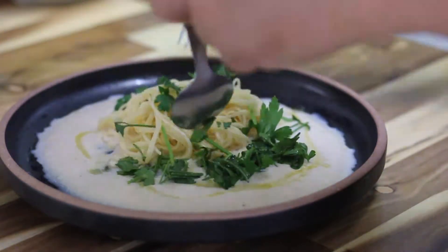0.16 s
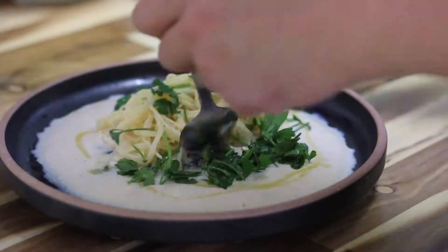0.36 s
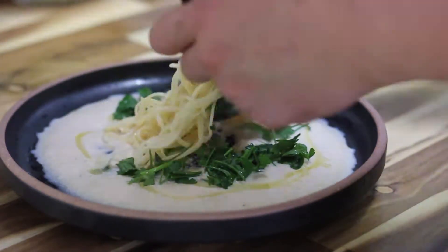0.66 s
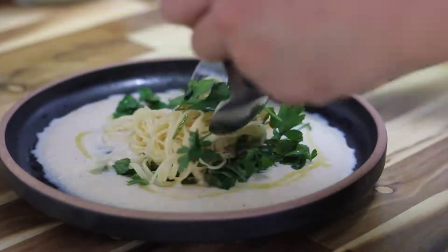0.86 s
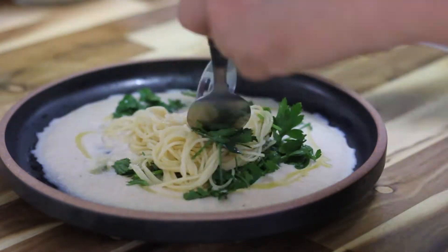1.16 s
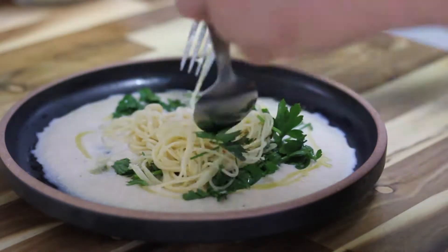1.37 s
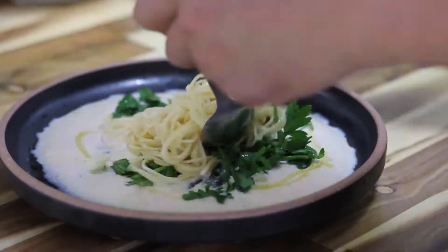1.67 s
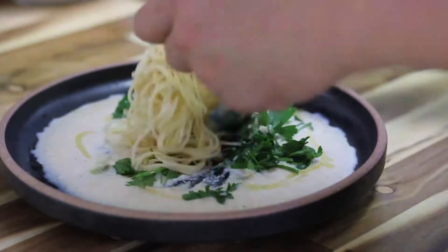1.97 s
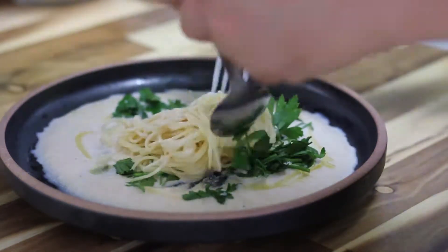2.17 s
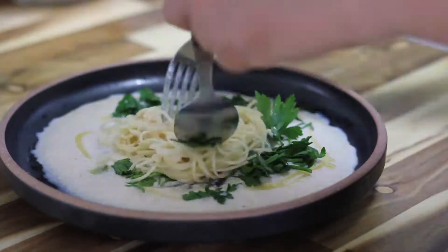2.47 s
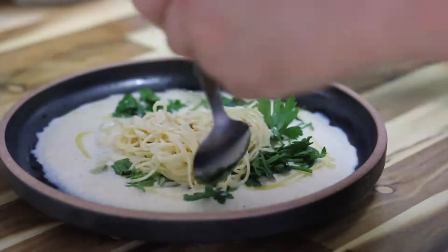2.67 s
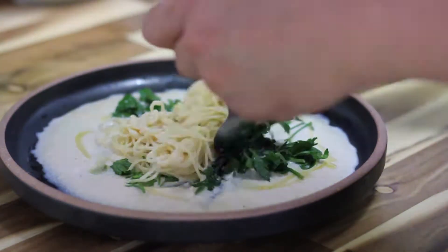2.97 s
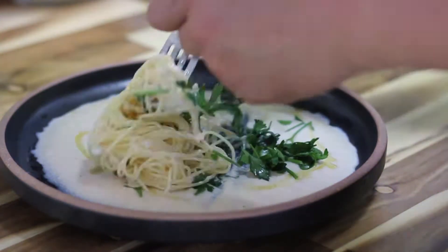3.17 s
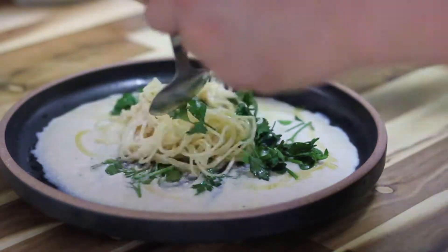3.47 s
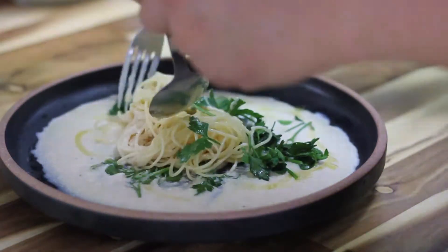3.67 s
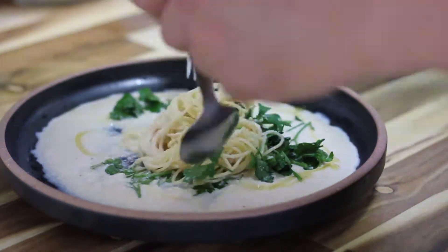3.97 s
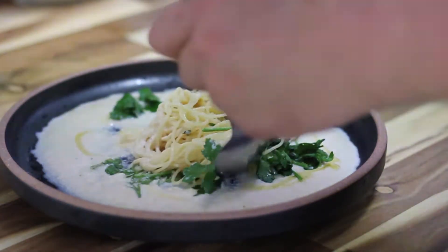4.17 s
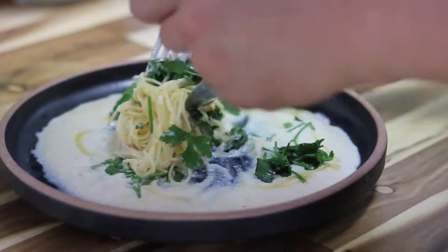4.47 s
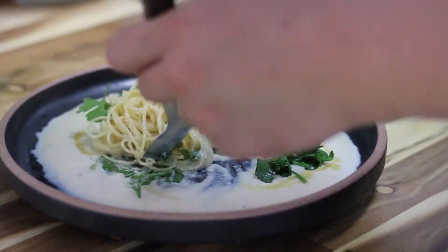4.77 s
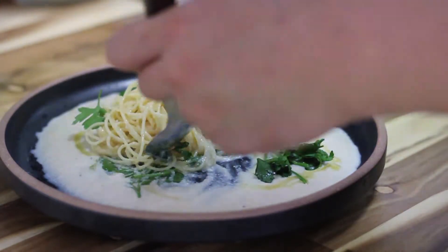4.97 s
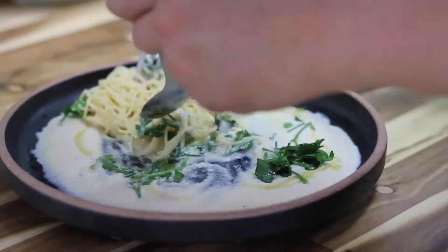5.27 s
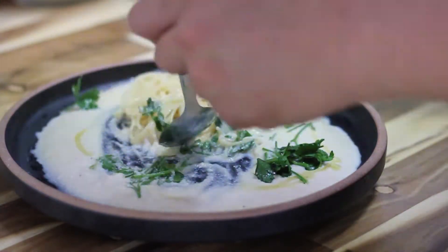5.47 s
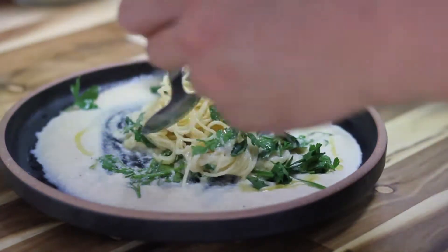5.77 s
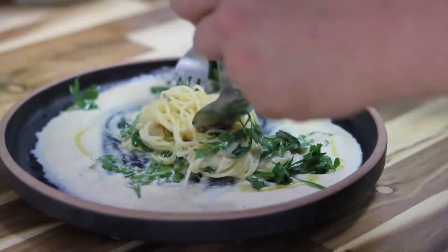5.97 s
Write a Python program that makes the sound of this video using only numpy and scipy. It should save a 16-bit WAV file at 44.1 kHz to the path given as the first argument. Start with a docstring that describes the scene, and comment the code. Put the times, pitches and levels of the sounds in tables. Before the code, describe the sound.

A metal fork and spoon knock, clink and scrape on a stoneware plate while twirling wet pasta, over a steady kitchen hum.

```python
"""One microphone near a stoneware plate of pasta on a wooden table, in a small, hard-walled kitchen.
An appliance hums behind from the start; wet strands tick and squelch as fork and spoon twirl them.
At 0.3 s the cutlery knocks on the plate and shakes the table; at 1.1 s the fork clinks. Light skids
over the glaze follow, then two more knocks, at 3.7 and 4.1 s, each running into a scrape. Short steel
squeals come near 4.7 and 5.4 s, and the pasta crackles to the end. The room answers every contact."""
import sys
import numpy as np
from scipy import signal
from scipy.fft import rfft, irfft
from scipy.io import wavfile

SR = 44100
rng = np.random.default_rng(int(sys.argv[2]) if len(sys.argv) > 2 else 0)


def digitize_waveform(pressure):
    """Quantize a signal to 16-bit integers and store it at the path in sys.argv[1].

    Rows of a 2-D input are taken as channels; values are limited to [-1, 1].
    """
    field = np.atleast_2d(pressure).T
    bounded = np.clip(field, -1, 1)
    quanta = np.round(bounded * 32767).astype(np.int16)
    wavfile.write(sys.argv[1], SR, quanta)


N = 269451


def amp(db):
    """Decibels to gain."""
    return 10 ** (np.asarray(db) / 20)


def unit_rms(x):
    """Scales to an rms of one."""
    return x / np.sqrt(np.mean(x ** 2) + 1e-20)


def curve_at(points, hz, column=1):
    """Interpolates one column of a table on a log-frequency axis."""
    columns = np.transpose(points)
    return np.interp(np.log(hz + 1), np.log(columns[0] + 1), columns[column])


def add(mix, start_s, sound):
    """Mixes a sound in at its start time."""
    part = mix[max(round(start_s * SR), 0):][:len(sound)]
    part += sound[:len(part)]


def band(x, hz, octaves):
    """A gentle band-pass around hz."""
    half_span = 2 ** (octaves / 2)
    top_hz = min(hz * half_span, .47 * SR)
    low_hz = min(hz, top_hz) / half_span
    return signal.sosfilt(signal.butter(2, [low_hz, top_hz], "band", fs=SR, output="sos"), x)


def drift(rate_hz):
    """A slow random wander with an rms of one."""
    hz = np.fft.rfftfreq(N, 1 / SR)[:N // 64]
    slow = irfft(rfft(rng.standard_normal(N))[:len(hz)] * np.exp(-(hz / rate_hz) ** 2))
    return unit_rms(np.interp(np.linspace(0, len(slow) - 1, N), np.arange(len(slow)), slow))


def room_tone(level_db=-49.5):
    """The steady rush of air all around the microphone."""
    # spectrum of the room's air: (frequency [Hz], relative density [dB])
    spectrum = [(15, -78), (25, -28.5), (185, -11), (236, -2.5), (293, -9.5), (405, -8.5), (463, -7.5),
                (531, -13.5), (754, -15), (988, -19.5), (2690, -24), (3620, -25), (4370, -27.5),
                (14800, -36.5), (16000, -40)]
    colour = amp(curve_at(spectrum, np.fft.rfftfreq(N, 1 / SR)))
    return amp(level_db) * unit_rms(irfft(rfft(rng.standard_normal(N)) * colour, N))


def appliance_hum(drift_hz=9, flutter_db=0.45):
    """A motor in the background, its tones wavering a little in pitch and level."""
    # motor tones: (frequency [Hz], rms level [dB], rms pitch waver [Hz])
    tones = [(120.4, -64.5, 1.18), (238.8, -52.5, 4.82), (471.5, -47, 0.73), (654, -65.5, 1.24),
             (762.5, -61, 0.75), (3305, -72, 1.62), (3510, -86, 1.8), (3780, -73.5, 2.04)]
    hum = np.zeros(N)
    for hz, db, waver_hz in tones:
        phase = 2 * np.pi * np.cumsum(hz + waver_hz * drift(drift_hz)) / SR
        hum += amp(db) * np.sqrt(2) * np.sin(phase)
    return hum * amp(flutter_db * drift(drift_hz))


def kitchen(direct_db=-3, tail_delay_s=.006):
    """From plate to microphone: the direct path, near bounces and a tail that dies band by band."""
    # reverberation: (frequency [Hz], time to fall 60 dB [s], tail level [dB])
    reverb = [(144, 1, -1.5), (398, 0.27, 2), (1070, 0.44, -1.5), (2400, .35, -3.5), (5440, 0.34, 1.5),
              (10800, 0.33, -6), (15600, 0.27, -0.5)]
    # bounces off nearby surfaces: (delay [s], level [dB])
    echoes = [(.005, -9), (0.0112, -29), (.012, -14.5)]
    hz, t, tail = signal.stft(rng.standard_normal(SR // 2), SR, nperseg=256)
    decay_rate = np.log(1000) / curve_at(reverb, hz)[:, None]
    tail_gain = amp(curve_at(reverb, hz, column=2))[:, None]
    tail *= tail_gain * np.exp(-decay_rate * t) * np.sqrt(2 * decay_rate / SR)
    response = np.zeros(SR // 2)
    add(response, tail_delay_s, signal.istft(tail, SR, nperseg=256)[1])
    for delay_s, db in [(0.001, direct_db)] + echoes:
        add(response, delay_s, amp([db]))
    return response


def stirring(rest_db=-72.5, turn_ends_db=-10):
    """How hard the pasta is worked: each turn of the fork swells and eases in one arch."""
    # turns of the fork: (time [s], length [s], crackle level at mid-turn [dB])
    turns = [(0, 0.041, -53.5), (0.5, 0.45, -71), (1.64, 0.5, -62.5), (2.335, 0.24, -57),
             (3.162, 0.39, -56), (3.82, 0.16, -60), (4.48, 0.17, -57.5), (5.078, 0.32, -50.5),
             (5.566, 0.18, -57), (5.94, 0.14, -51)]
    effort = np.full(N, amp(rest_db))
    for start_s, length_s, db in turns:
        arch_db = turn_ends_db * np.linspace(-1, 1, int(length_s * SR)) ** 2
        add(effort, start_s, amp(db + arch_db))
    return effort


def squelch(pops_per_s=190, low_hz=4200, high_hz=14000, octaves=0.29, bands=8):
    """Tiny wet pops of many pitches, their level following the stirring."""
    pops = np.zeros(N)
    for hz in np.linspace(low_hz, high_hz, bands):
        onsets = rng.random(N) < pops_per_s / bands / SR
        sizes = amp(4 * np.minimum(rng.exponential(1, N), 3))  # spread over 12 dB
        pops += band(onsets * sizes + 1e-9, hz, octaves)
    return stirring() * unit_rms(pops)


def sauce_ticks(gain_db=3.5, octaves=0.79):
    """Films of sauce snap between parting strands, each a click of a few cycles."""
    # the loudest snaps: (time [s], relative peak level [dB], pitch [Hz])
    snaps = [(0.0456, -31.5, 6600), (1.2286, -26.5, 3680), (1.9067, -36, 13700), (2.4857, -32, 4010),
             (2.6412, -35, 10500), (2.9756, -28.5, 5000), (3.1258, -27.5, 11000), (4.5935, -30.5, 5300),
             (4.6438, -26.5, 9700), (5.0814, -25.5, 13300), (5.1899, -28, 3890), (6.0252, -36, 3200)]
    out = np.zeros(N)
    for start_s, db, hz in snaps:
        snap = band(signal.unit_impulse(SR // 100), hz, octaves)
        add(out, start_s, amp(db + gain_db) * snap / abs(snap).max())
    return out


def ring(modes, pitch=1, tilt_db=0, narrow_hz=20, pivot_hz=8000):
    """A body's answer to a tap, as two rows: its damped modes and its long, narrow ones."""
    time = np.arange(SR // 2) / SR
    rows = np.zeros((2, len(time)))
    for hz, width_hz, db in modes:
        narrow = width_hz < narrow_hz
        decay_rate = np.pi * width_hz * (1 if narrow else np.pi / 2)
        t = time[:int(10 * SR / decay_rate)]
        # a damped resonance builds up while the bending wave crosses the body
        build_up = 1 if narrow else decay_rate * t
        envelope = build_up * np.exp(-decay_rate * t)
        gain = amp(db + tilt_db * np.log2(hz / pivot_hz)) * 2 * decay_rate / SR
        add(rows[int(narrow)], 0, gain * envelope * np.cos(2 * np.pi * hz * pitch * t))
    return rows


def radiate(body):
    """Damped modes fill the room, by new paths for each contact; narrow ones ring on by themselves."""
    damped, lasting = body
    return lasting + signal.fftconvolve(damped, kitchen())[:len(lasting)]


def plate_on_table(table, plate, table_db, plate_db, push_hz, push_octaves):
    """The plate rings in the band a contact pushes; the table shakes, deeper for a heavier contact."""
    lowest_hz, heavy_db, octaves_per_db = 100, 25, 0.54
    cutoff_hz = lowest_hz * 2 ** np.clip((heavy_db - table_db) * octaves_per_db, 0, 1)
    thud = signal.sosfilt(signal.butter(3, cutoff_hz, "high", fs=SR, output="sos"), table)
    return amp(table_db) * thud + amp(plate_db) * band(plate, push_hz, push_octaves)


def stick_slip(length_s, swell_db, slips_per_s=2200, spread_db=4, grit=0.068, swell_curve=0.64):
    """Steel catches and slips on the glaze: a dense run of uneven jolts with an energy of one."""
    size = int(length_s * SR)
    onsets = rng.random(SR)[:size] < slips_per_s / SR
    strength = amp(spread_db * rng.standard_normal(SR)[:size])
    grain = rng.standard_normal(SR)[:size]
    jolts = onsets * strength * np.sign(grain) + grit * grain
    for _ in range(3):  # flatten the spectrum, so all modes are fed alike
        phase = np.angle(rfft(jolts, 2 * size))
        jolts = irfft(np.exp(1j * phase))[:size]
    hand_pressure = amp(swell_db * np.linspace(0, 1, size) ** swell_curve)
    return unit_rms(jolts * hand_pressure) / np.sqrt(size)


def cutlery_skids(table, plate):
    """Tines and spoon edge skid over the plate, which grinds while the steel rasps and squeals."""
    # strokes: (time [s], length [s], swell from start to end [dB], table level [dB], plate level [dB],
    # squeal level [dB], push centre [Hz], push span [octaves], squeal pitch [ratio], tilt [dB/octave])
    strokes = [(0.303, 0.026, -3, 24.5, 10, -8, 1430, 1.2, 0.8, -8),
               (1.579, 0.0096, 1, -1, 8.5, 5, 1660, 1.37, 1.05, -0.5),
               (2.715, 0.12, -10, 6.5, 13, -36, 714, 0.4, 1.2, 0),
               (2.853, 0.019, -4, 3, 9.5, 6.5, 1900, 0.65, 1.12, 1),
               (2.883, 0.012, -20, -7, 11, 4, 2020, 0.73, 1.08, 1),
               (3.747, 0.038, -8, 20, 18, -0.5, 4270, 0.56, 0.96, -4),
               (4.124, 0.14, -4.5, 13.5, 25, 3.5, 1900, 1.71, 1.253, -4),
               (4.666, 0.079, 11, 3, 1.5, 11, 1740, 2.2, 1.024, 1),
               (5.427, 0.065, -4, 10, 7, 13.5, 2550, 1.5, 1.015, 6.5),
               (5.493, 0.013, 2, 5, 1.5, 9.5, 2300, 2.2, 0.95, 4)]
    # steel squealing on glaze, before a stroke's pitch and tilt: (frequency [Hz], width [Hz], level [dB])
    squeal_modes = [(2450, 320, 0), (3353, 400, -12), (4976, 450, -2), (5850, 620, 3), (7538, 800, -11),
                    (8550, 500, -8), (10600, 680, 5), (11500, 550, 0), (12300, 450, -5), (13741, 650, -13),
                    (15010, 700, -8)]
    # the broad rasp of the contact, likewise: (frequency [Hz], width [Hz], level [dB])
    rasp = [(8000, 2500, -9)]
    out = np.zeros(N)
    for start_s, length_s, swell_db, table_db, plate_db, squeal_db, hz, span, pitch, tilt_db in strokes:
        grind = plate_on_table(table, plate, table_db, plate_db, hz, span)
        squeal = amp(squeal_db) * ring(squeal_modes + rasp, pitch, tilt_db)
        add(out, start_s, signal.fftconvolve(stick_slip(length_s, swell_db), radiate(grind + squeal)))
    return out


def cutlery_knocks(table, plate):
    """In the foreground, single hard contacts of steel on steel and steel on stoneware."""
    # contacts: (time [s], table level [dB], plate level [dB], fork level [dB], spoon level [dB],
    # centre of the push on the plate [Hz], push span [octaves])
    contacts = [(0.2994, 8, 7, 9, 16.5, 1810, 1.1), (0.3365, 16, 22, -1.5, 10, 2600, 4.9),
                (0.3419, 26, 16.5, -8, -20, 1300, 3.1), (1.0996, -24, -39, 15, 0, 3100, 1.3),
                (3.732, 13, 6, -2.5, 13, 1610, 4.2), (3.7394, 21, 16.5, -14, -9, 1010, 2.3),
                (4.125, 18.5, 15, -10, -10, 2700, 1.85)]
    # modes of the fork: (frequency [Hz], width [Hz], level [dB])
    fork_modes = [(2734, 88, -2), (3433, 120, -1.5), (5300, 280, -4.5), (6500, 540, -8.5), (8710, 260, 4),
                  (11300, 320, 0.5), (12000, 240, 7.5), (13200, 570, 5), (13900, 490, -4), (15185, 560, -2)]
    # modes of the spoon: (frequency [Hz], width [Hz], level [dB])
    spoon_modes = [(2580, 210, -6), (5430, 1270, -7), (6320, 200, -7.5), (7480, 360, -9),
                   (8930, 150, -18.5), (11010, 300, -0.5), (12300, 1100, -7.5), (14100, 780, -11)]
    fork, spoon = ring(fork_modes), ring(spoon_modes)
    out = np.zeros(N)
    for start_s, table_db, plate_db, fork_db, spoon_db, hz, span in contacts:
        knock = plate_on_table(table, plate, table_db, plate_db, hz, span)
        clink = amp(fork_db) * fork + amp(spoon_db) * spoon
        add(out, start_s, radiate(knock + clink))
    return out


def scene():
    """Cutlery, plate and pasta near the microphone, the humming kitchen behind, in mono."""
    # modes of the wooden table top: (frequency [Hz], width [Hz], level [dB])
    table_modes = [(108, 14, -9), (203, 9, 2), (240, 10, 3), (312, 12, -7), (364, 10, 4), (407, 12, -3),
                   (534, 9, 2), (210, 70, -16), (365, 130, -2), (520, 120, -11)]
    # modes of the stoneware plate: (frequency [Hz], width [Hz], level [dB])
    plate_modes = [(735, 12, -5), (842, 12, -3), (1245, 8, 5), (1288, 8, 10), (1352, 10, 1), (1461, 12, -3),
                   (1530, 14, -7), (2084, 10, 1), (2166, 10, 2), (2292, 9, 7), (2417, 12, -2),
                   (3004, 10, -1), (3110, 10, 0), (760, 140, -10), (975, 100, -1), (1310, 115, 2.5),
                   (2260, 140, 3.5), (3030, 230, -3.5), (3500, 230, -5), (4373, 330, -16), (5191, 700, -10),
                   (6234, 335, -14), (7368, 242, -12)]
    table, plate = ring(table_modes), ring(plate_modes)
    pasta = signal.oaconvolve(sauce_ticks() + squelch(), kitchen(direct_db=-0.5))[:N]
    cutlery = cutlery_knocks(table, plate) + cutlery_skids(table, plate)
    return (cutlery + pasta + appliance_hum() + room_tone())[None]


def record(dry):
    """The recorder's band limit cuts the treble above 16 kHz."""
    low_pass = signal.firwin(255, 16000, window=("kaiser", 9), fs=SR)
    return signal.oaconvolve(dry, low_pass[None], "same")


dry = scene()
out = record(dry)
digitize_waveform(out)
```